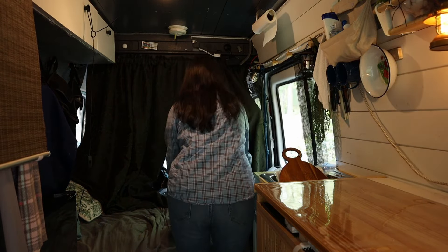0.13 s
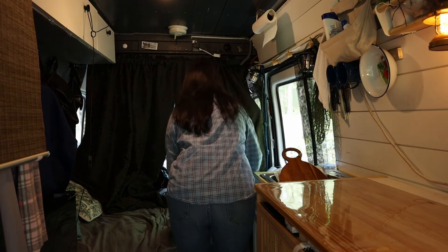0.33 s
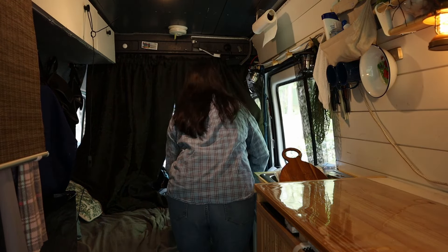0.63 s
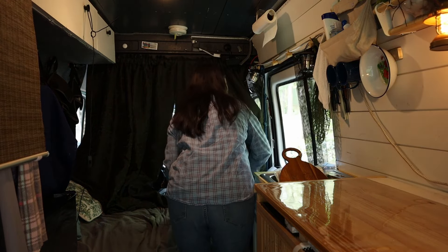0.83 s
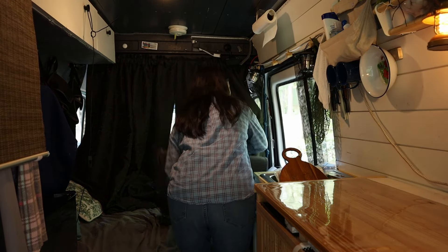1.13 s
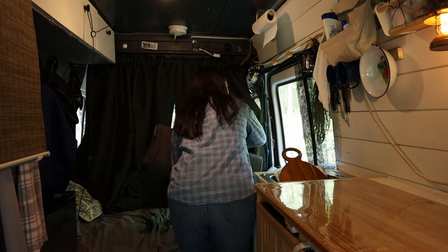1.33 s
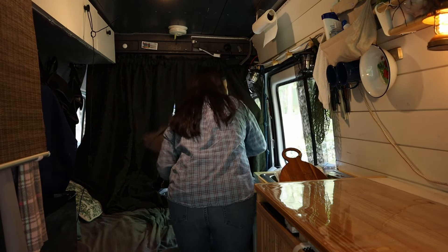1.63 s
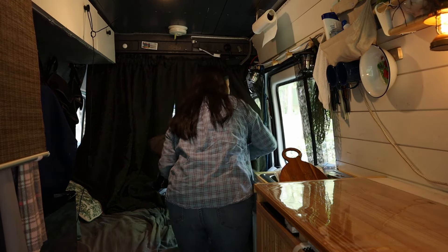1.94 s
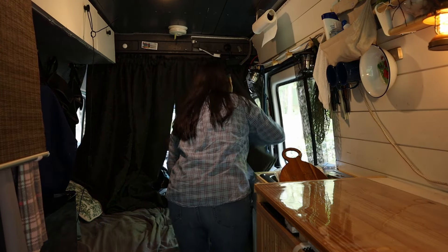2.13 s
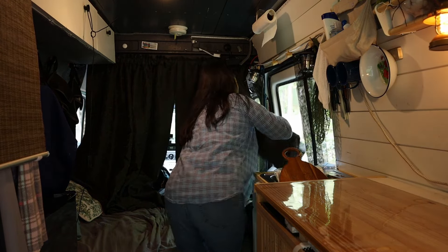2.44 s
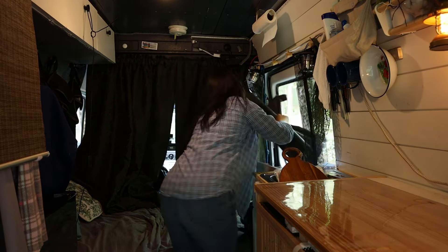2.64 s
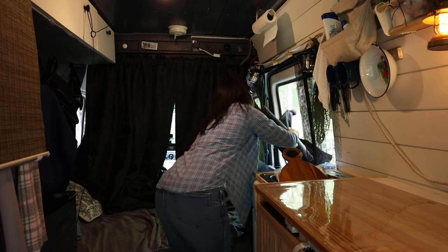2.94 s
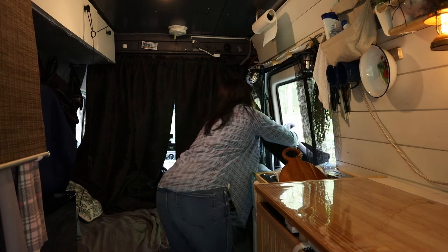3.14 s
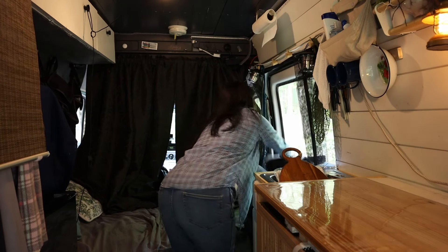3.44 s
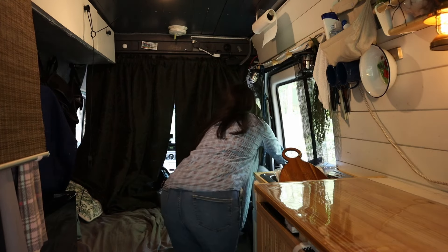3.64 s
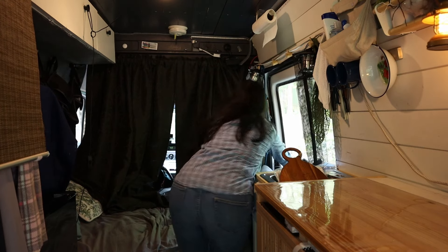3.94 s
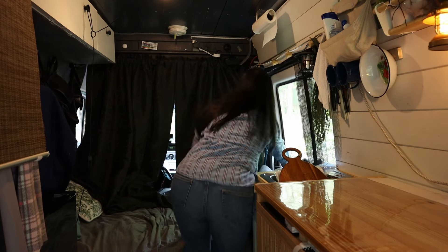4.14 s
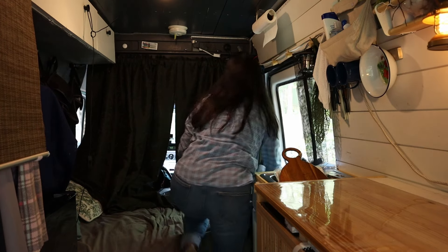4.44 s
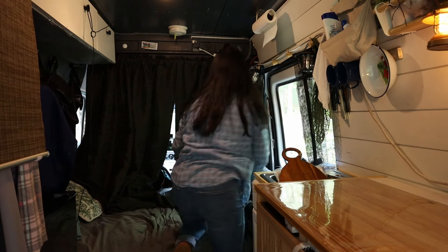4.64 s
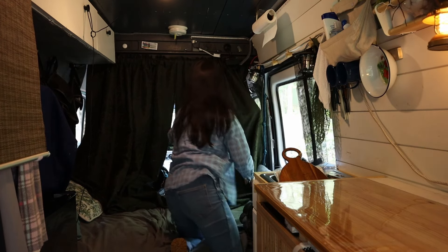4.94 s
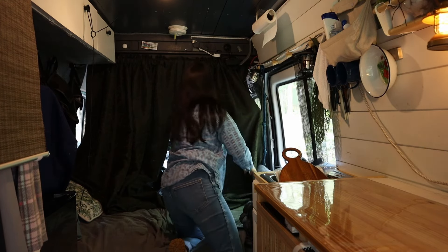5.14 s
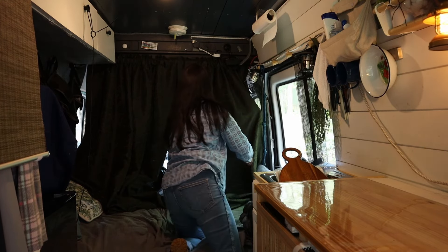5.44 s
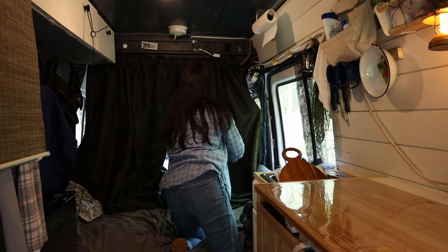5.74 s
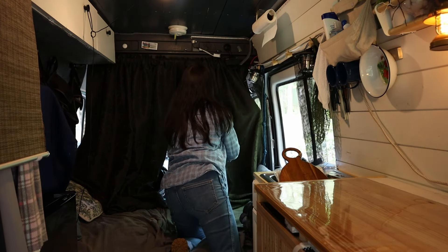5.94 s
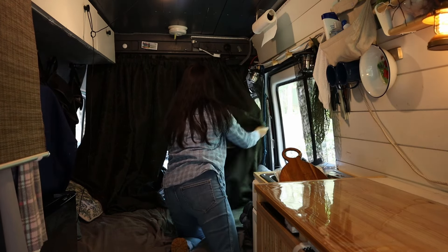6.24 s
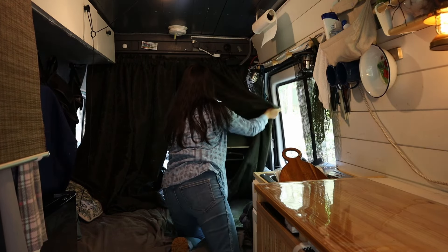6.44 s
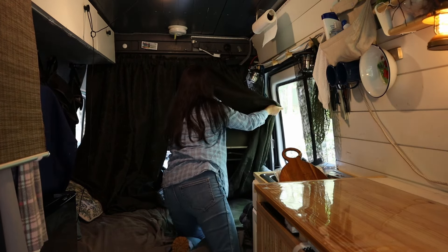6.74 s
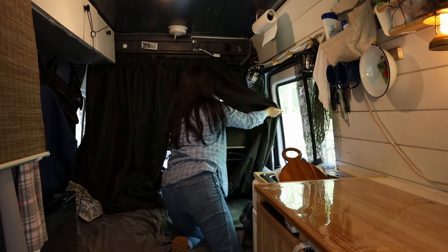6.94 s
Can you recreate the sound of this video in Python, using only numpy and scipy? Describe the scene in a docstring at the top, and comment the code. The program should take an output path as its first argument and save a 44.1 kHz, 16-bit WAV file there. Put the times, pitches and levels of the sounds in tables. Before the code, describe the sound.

In a small wood-lined parked van, close stereo microphones hear a steady low rumble with a very faint, thin whine. From 0 to 2.2 s heavy cloth rubs in short, overlapping strokes, with dry crackling creases; a padded bump and push of air come around 1.35 s, softer bumps near 1.7 s and a bright snap at 1.8 s. From 2.3 to 3.5 s the rubbing is lighter, with crisp snaps and small hard ticks. At about 3.56 s one sharp, loud knock strikes wood, chatters and rattles to rest. Low padded thuds follow until 3.9 s, then softer knee blows, cloth rustle and dull bedding scrapes to about 5.4 s, with a short bed-frame groan near 5.2 s. A small cluster of ticks falls around 5.5 s. Afterwards only sparse ticks, faint cloth and a soft weight shift near 6.5 s remain, until about 7 s.

```python
"""Cloth rubs and creases as someone in a parked van pulls a padded cover from behind a heavy curtain.
Small hard fittings tick, the cover lands with one sharp knock on wood, and bed and furniture thud under knees.
A low rumble with a faint whine fills the cabin.
Cloth is coloured friction noise plus runs of snaps; hard and padded bodies are struck decaying modes;
the room is a short dense echo, and two close microphone ports hear it all."""
import sys
import numpy as np
from scipy import signal
from scipy.fft import rfft, irfft
from scipy.io import wavfile
from scipy.ndimage import uniform_filter1d, minimum_filter1d

SR = 44100
rng = np.random.default_rng(int(sys.argv[2]) if len(sys.argv) > 2 else 0)


def persist_wave(psi):
    """Save psi, clipped to +-1, as 16-bit WAV."""
    counts = np.round(np.clip(psi, -1, 1) * 32767).astype(np.int16)
    wavfile.write(sys.argv[1], SR, np.atleast_2d(counts).T)


N = 312669
TIME, BINS = np.arange(N) / SR, np.fft.rfftfreq(N, 1 / SR)
RING = TIME[:SR // 2]  # time axis of one struck sound, s
HEAVY_GRAIN = dict(per_s=2000, spread_db=2, grain_share=.3, flutter_db=.6)  # heavy folds and bedding


def amp(db):
    """Decibels to gain."""
    return 10 ** (np.asarray(db) / 20)


def unit(x):
    """Scales to rms 1."""
    return x / np.sqrt(np.mean(x ** 2) + 1e-20)


def read(points, hz):
    """Joins (Hz, value) points on a log-frequency axis."""
    f, value = np.transpose(points)
    return np.interp(np.log(hz + 1), np.log(f + 1), value)


def add(mix, s, sound):
    """Adds a sound to the mix at time s."""
    part = mix[..., max(round(s * SR), 0):][..., :sound.shape[-1]]
    part += sound[..., :part.shape[-1]]


def colour(x, spectrum):
    """Filters a steady sound by a spectrum, then scales to rms 1."""
    return unit(irfft(rfft(x) * amp(read(spectrum, BINS)), N))


def band(x, hz, ratio, order=2):
    """Causal band-pass from hz / ratio to hz * ratio."""
    sos = signal.butter(order, [hz / ratio, hz * ratio], "band", fs=SR, output="sos")
    return signal.sosfilt(sos, x)


def wander(rate_hz):
    """Slow random motion of rms 1."""
    return unit(irfft(rfft(rng.standard_normal(N)) / (1 + (BINS / rate_hz) ** 2), N))


def fade(t60_s):
    """Exponential decay, 60 dB down after t60_s."""
    return np.exp(-np.log(1000) * RING / t60_s)


def sine(hz):
    """One undamped mode, starting at zero phase."""
    return np.sin(2 * np.pi * hz * RING)


def burst(hz, ratio, t60_s):
    """Two rows of a dying cluster of many close modes around hz, starting at about rms 1."""
    shape = fade(t60_s)
    x = band(rng.standard_normal((2, len(RING))) * shape, hz, ratio, order=3)
    return x * np.linalg.norm(shape) / np.linalg.norm(x, axis=1, keepdims=True)


def friction(per_s, spread_db, grain_share, flutter_db):
    """Countless fibres slip as a hiss; single threads catch and let go as grains; the pressure flutters."""
    sizes = amp(spread_db * np.minimum(rng.exponential(1, N), 4))
    caught = rng.random(N) < per_s / SR
    grains = unit(sizes * rng.choice([-1, 1], (2, N)) * caught)
    hiss = rng.standard_normal((2, N))
    mixed = np.sqrt(grain_share) * grains + np.sqrt(1 - grain_share) * hiss
    return mixed * amp(flutter_db * wander(49))


def gesture(start_s, length_s, attack_s, release_s):
    """A movement gathers speed, holds until start + length and dies away exponentially."""
    rise = np.clip((TIME - start_s) / attack_s, 0, 1)
    return rise * np.exp(-np.clip((TIME - start_s - length_s) / release_s, 0, 20))


def effort(rows, attack_s, release_s):
    """Joint gain of (start_s, length_s, level_db) movements: their powers add."""
    powers = [(amp(db) * gesture(start, length, attack_s, release_s)) ** 2 for start, length, db in rows]
    return np.sqrt(sum(powers))


# left-right coherence of near sounds: frequency_hz, coherence (0-1)
NEAR_COHERENCE = [(70, 1), (250, 1), (1200, 0.98), (2500, 1), (4500, 0.64), (8000, 0.38), (14000, 0.9)]
# lag of the left port: frequency_hz, lag_rad
PORT_PHASE = [(20, .01), (100, .05), (250, .13), (500, .26), (1000, .5), (2000, .98), (4000, 2.1),
              (6500, 2.8), (15000, 2.7)]


def ports(pair, coherence=NEAR_COHERENCE):
    """Two close ports share row one; row two enters the left as coherence falls, and left lags in phase."""
    right, other = rfft(pair)
    same = read(coherence, BINS)
    left = (same * right + np.sqrt(1 - same ** 2) * other) * np.exp(-1j * read(PORT_PHASE, BINS))
    return irfft(np.array([left, right]), N)


# echo decay of the cabin: frequency_hz, t60_s
CABIN_DECAY = [(100, .35), (400, .36), (1000, .26), (3000, .14), (10000, .07)]


def cabin(x):
    """Short, dense echo of a small wood-lined room: noise decaying at its own rate in each band."""
    hz, t, z = signal.stft(rng.standard_normal((2, SR // 2)), SR, nperseg=256)
    decay = amp(-60 * t / read(CABIN_DECAY, hz)[:, None])
    tail = signal.istft(z * decay, SR, nperseg=256)[1]
    tail[:, :SR // 200] = 0  # the nearest wall answers after 5 ms
    tail /= np.linalg.norm(tail[0])
    return ports(signal.fftconvolve(x[None], tail, axes=1)[:, :N])


# strokes of cloth on cloth, levels before the layer trims in cloth():
# start_s, length_s, rub_db, fizz_re_rub_db, folds_re_rub_db, release_s (time constant)
STROKES = [(-.02, .13, -43, -8, -20, 0.065), (0.171, 0.089, -39, -7, -14, 0.043),
           (0.248, .06, -46, -8, -8, .012), (0.368, 0.068, -51.5, -5, 1, .05),
           (0.434, 0.17, -45, -4, -3.5, 0.045), (0.609, .13, -43.5, -8, -6, 0.052),
           (0.762, .12, -41, -7, -7, 0.062), (.89, 0.15, -46.5, -10.5, 0.5, 0.048),
           (1.027, 0.14, -48, -10.5, -2, 0.023), (1.193, 0.14, -47.5, -6.5, -2, 0.03),
           (1.342, 0.023, -38, -10, 0, .05), (1.372, 0.052, -35, -9, -10, 0.044),
           (1.453, .15, -44.5, -8, -2.5, 0.044), (1.61, 0.19, -39.5, -10, -10, .04),
           (1.81, 0.067, -39.5, -14, -14, 0.038), (1.886, .1, -42, -8.5, -4, 0.041),
           (2, 0.22, -49.5, -9, -0.5, 0.039), (2.225, .16, -60.5, -18, 4, .04),
           (2.598, 0.63, -55, -10.5, -13, 0.066), (2.876, 0.022, -44, -16, 0, 0.023),
           (2.972, 0.048, -46, -3, 5, 0.025), (3.108, 0.075, -45, -10, -4, 0.031),
           (3.218, 0.065, -47.5, -9, -5, 0.024), (3.296, .12, -48, -6, -4, 0.047),
           (3.426, 0.17, -48.5, -9, 6, 0.046), (3.605, 0.071, -45, -9, -11, 0.027),
           (3.764, .23, -47.5, -9.5, 1.5, 0.063), (4.035, 0.16, -50, -14, 7, .05),
           (4.203, .11, -46.5, -4, 2.5, .055), (4.297, .11, -48.5, -3.5, -15, 0.035),
           (4.436, 0.088, -54.5, -27, 4, 0.079), (4.65, 0.31, -55, -11, 10.5, .055),
           (4.811, .2, -47.5, -16, 5.5, .045), (5.068, 0.14, -52, -23, 9.5, 0.04),
           (5.217, .016, -44.5, -18, 10.5, 0.031), (5.634, 0.39, -60, -25, 5.5, .055),
           (6.009, .045, -53.5, -6, 5, .03), (6.302, 0.32, -66, -2, -12, .055),
           (6.924, .13, -57, -10, 8, .055)]
# clothing that never quite lies still, before the same trims: rub_db, fizz_db, folds_db
RESTING_DB = (-63.5, -69, -53.5)


def stroke_gains(attack_s=0.022):
    """Gains of rub, fizz and folds: all follow each stroke, above the stir of resting clothes."""
    shapes = np.array([gesture(start, length, attack_s, release)
                       for start, length, *_, release in STROKES])
    levels = amp([(rub, rub + fizz, rub + folds) for _, _, rub, fizz, folds, _ in STROKES])
    return np.sqrt(levels.T ** 2 @ shapes ** 2 + amp(RESTING_DB)[:, None] ** 2)


def drift(x, patch_db, patch_hz, patch_s):
    """As folds open and close, patches of the spectrum swell and sink."""
    hz, t, z = signal.stft(x, SR, nperseg=512)
    field = uniform_filter1d(rng.standard_normal(z.shape), max(round(patch_hz / hz[1]), 1), axis=-2)
    field = uniform_filter1d(field[0], max(round(patch_s / t[1]), 1), axis=-1)
    return signal.istft(z * amp(patch_db * unit(field)), SR, nperseg=512)[1][:, :N]


# spectrum of the rubbed weave: frequency_hz, density_db (per Hz, relative)
RUB = [(290, -31), (500, -9), (693, -7.5), (915, -10), (1010, -3), (1150, -5.5), (1560, -2), (2210, 0.5),
       (2990, -0.5), (4000, -6.5), (9000, -30.5), (11700, -61), (19800, -120)]
# spectrum of the brushed fibres: frequency_hz, density_db (per Hz, relative)
FIZZ = [(2500, -35), (4500, 0), (6000, -2), (9000, -6), (11500, -16.5), (14000, -18.5), (16000, -31)]
# spectrum of the heavy folds: frequency_hz, density_db (per Hz, relative)
FOLDS = [(50, -28), (130, 0.5), (300, 2), (700, 3.5), (1100, 4), (1700, 0.5), (3000, -57.5)]


def cloth(rub_gain, fizz_gain, fold_gain):
    """Each stroke rubs the weave, brushes its fibres and shifts heavy folds, under an uneven grip."""
    grip = amp(0.5 * wander(27))
    weave = friction(per_s=700, spread_db=2.2, grain_share=.45, flutter_db=1.3)
    rub = amp(2.0) * rub_gain * colour(weave, RUB)
    rub = drift(rub, patch_db=2.0, patch_hz=600, patch_s=0.055)
    fibres = friction(per_s=590, spread_db=5.5, grain_share=0.17, flutter_db=2.5)
    fizz = amp(-1.0) * fizz_gain * colour(fibres, FIZZ)
    folds = amp(-5.5) * fold_gain * colour(friction(**HEAVY_GRAIN), FOLDS)
    return ports(grip * (rub + fizz + folds))


def crease(db, length_s, crunch_db, snaps_per_s=350):
    """A fold gives way in a quick run of snaps, each a bright crack over a duller crunch."""
    run = rng.uniform(-0.96, 1, len(RING)) * (rng.random(len(RING)) < snaps_per_s / SR)
    run *= 2 * amp(-3.5) * (RING < length_s)
    run[0] = 1  # the first snap
    crack = burst(3450, 1.85, .022) + amp(-13.5) * burst(9200, 1.29, 0.027)
    snap = crack + amp(crunch_db) * burst(2220, 1.74, 0.036)
    return amp(db - 10.0) * signal.fftconvolve(run[None, :SR // 10], snap[:, :SR // 10], axes=1)


# placed buckling folds, level before the 10 dB cut in crease():
# start_s, level_db, crackle_length_s, crunch_re_crack_db
CREASES = [(.057, -41, .015, -6), (.165, -35.5, .01, -3), (0.6074, -32, .012, -5), (0.6526, -34, .02, 8.5),
           (.7073, -32.5, .02, 4), (0.7622, -34.5, .035, 4.5), (1.046, -39, .015, -3),
           (1.107, -38, .008, -1), (1.258, -35, .012, 4.5), (1.394, -33.5, .008, -5),
           (1.521, -36.5, .012, 7), (1.57, -35, .01, 0), (1.742, -42, .012, 3), (1.78, -24.5, .003, 4),
           (1.8542, -33, .025, 2), (1.925, -34.5, .012, 0), (1.9755, -40, .014, -8),
           (2.041, -40.5, .008, 9.5), (2.098, -39, .01, 5), (2.14, -33, .012, -14), (2.197, -34, .003, -6),
           (2.25, -39.5, .008, 6), (2.2982, -27.5, .005, -8), (2.344, -32, .005, -1),
           (2.373, -31, .01, -14), (2.533, -40, .01, -10), (2.61, -40, .012, -3), (2.672, -48, .015, -5),
           (2.803, -42, .005, 8.5), (2.8185, -36.5, .008, 4), (2.8941, -33, .012, 2),
           (2.934, -44.5, .008, 10), (2.959, -32, .008, 3), (3.001, -29, .014, 1.5),
           (3.0253, -32, .008, -9), (3.0816, -36, .003, -1), (3.116, -26, .006, -17),
           (3.134, -30, .008, -1), (3.155, -34, .015, 4.5), (3.1708, -36, .018, 3), (3.211, -34, .008, 3),
           (3.2645, -32.5, .008, -6), (3.2773, -34, .008, 0), (3.3226, -42, .006, 3),
           (3.3428, -37, .008, -7), (3.392, -39, .015, 2), (3.522, -43, .02, 7), (3.649, -33, .01, 1),
           (3.7164, -32, .004, -10), (4.0684, -40, .005, -10), (4.1644, -34.5, .012, 5),
           (4.207, -33, .008, -8), (4.409, -31, .012, 0.5), (4.519, -34.5, .005, -6),
           (4.744, -39, .008, -8), (4.851, -34, .008, -8), (5.242, -41, .008, -6), (5.2845, -39, .005, 5),
           (5.73, -52, .01, -8), (6.055, -44, .02, -3), (6.982, -54, .015, 10)]


def creases(rub_gain, small_count=50, small_spread_db=3):
    """Placed folds buckle at set moments; small ones come by chance, their level following the rubbing."""
    out = np.zeros((2, N))
    at = rng.integers(0, N, small_count)
    small_db = 20 * np.log10(rub_gain[at]) + small_spread_db * rng.standard_normal(small_count)
    for s, db in zip(at / SR, small_db):
        add(out, s, crease(db, length_s=.005, crunch_db=-1))
    for s, *fold in CREASES:
        add(out, s, crease(*fold))
    return ports(out) + amp(-9.5) * cabin(out[0])


# light touches of hard fittings: start_s, level_db (before layer trims), pitch_hz, t60_s (of the clack)
TICKS = [(1.7773, -26, 1540, 0.03), (2.298, -28, 2220, 0.052), (2.4064, -32.5, 2040, 0.047),
         (2.462, -39, 2730, 0.058), (2.533, -42, 2320, 0.16), (2.6713, -39.5, 2430, 0.063),
         (2.846, -35, 2900, 0.085), (2.9855, -30, 2750, 0.06), (3.0817, -38, 1890, 0.11),
         (3.3177, -40, 2500, .092), (3.277, -43, 1900, 0.037), (4.167, -33.5, 1790, 0.035),
         (4.742, -31.5, 1690, 0.074), (5.031, -30.5, 1460, 0.073), (5.284, -35, 1890, 0.029),
         (5.3708, -40.5, 1487, 0.095), (5.426, -41, 1490, .05), (5.47, -29.5, 2150, 0.061),
         (5.49, -28, 2150, 0.056), (5.5, -38, 2000, 0.051), (5.5358, -37.5, 1650, 0.048),
         (5.6083, -33.5, 1920, 0.075), (5.758, -44, 2080, .06), (5.827, -46, 2660, 0.056),
         (5.916, -38.5, 2060, 0.066), (6.049, -42, 1620, 0.085), (6.7598, -40.5, 1670, 0.07),
         (6.767, -43, 1550, 0.062)]
# contact click under each tick: level_re_clack_db, centre_hz, half_width_ratio, t60_s
CLICK_DB, CLICK_HZ, CLICK_RATIO, CLICK_T60_S = (-10, 1900, 2.3, .028)


def ticks(mode_db=-6.5, mode_t60_ratio=0.87):
    """Fittings touch: a tiny click, a short clack with broad skirts, and one clear decaying mode."""
    out = np.zeros((2, N))
    for s, db, hz, t60 in TICKS:
        clack = burst(hz, 1.31, t60) + amp(-9.5) * burst(hz, 1.84, t60)
        click = amp(CLICK_DB) * burst(CLICK_HZ, CLICK_RATIO, CLICK_T60_S)
        add(out, s, amp(db - 3.0) * (clack + click))
        add(out[0], s, amp(db + mode_db) * sine(hz) * fade(t60 * mode_t60_ratio))
    return ports(out) + amp(-16) * cabin(out[0])


# the sharp knock and its chatter: start_s, force_db (relative)
KNOCKS = [(3.5635, -2), (3.565, -3), (3.5663, 1), (3.5751, -9.5), (3.598, -30)]
# spectrum of one contact: frequency_hz, density_db (per Hz, relative)
CRACK = [(60, -22), (150, -16), (300, 7), (650, -4), (930, 14), (1350, 0), (2250, 4), (3200, -18),
         (5000, -40), (8000, -31), (12000, -28), (16000, -39)]
# ringing modes of the wood: pitch_hz, level_db, t60_s
WOOD = [(328, -24, .24), (436, -26.5, .17), (598, -25, .14), (706, -19, .07), (780, -21, .14),
        (886, -17, .09), (980, -14, .085), (1042, -16, .09), (1126, -12.5, .07), (1220, -19, .05),
        (1390, -23, .08), (1550, -20, .079), (1633, -19.5, .082), (1763, -11, .073), (1873, -23, .089),
        (2072, -14, .057), (2207, -24, .071), (2328, -15, .07), (2440, -17, .075), (2550, -24, .089),
        (2713, -25, .074)]
# direct knock between the ports: frequency_hz, left_minus_right_db
KNOCK_BALANCE = [(300, 2.5), (550, -6), (1000, 1.2), (2000, -0.3), (4000, -3), (12000, -6)]


def knock(crack_db=16, rattle_db=-19, room_db=-26, left_lag_ms=0.036):
    """A hard edge strikes wood and chatters: each contact cracks, and the panel rings on from the first."""
    log_gain = np.log(amp(read(CRACK, abs(np.fft.fftfreq(len(RING), 1 / SR)))))
    # minimum phase: the shortest causal click of that colour
    crack = np.fft.ifft(np.exp(np.conj(signal.hilbert(log_gain)))).real
    crack /= np.linalg.norm(crack)
    out = np.zeros(N)
    for s, db in KNOCKS:
        add(out, s, amp(db + crack_db) * crack)
    ring = sum(amp(db) * sine(hz) * fade(t60) for hz, db, t60 in WOOD)
    ring *= 1 - fade(0.0042)  # soft onset
    rattle = amp(rattle_db) * burst(1370, 1.97, 0.09)[0]
    add(out, KNOCKS[0][0], ring + rattle)
    lag = np.exp(-2j * np.pi * BINS * left_lag_ms / 1000)
    left = irfft(rfft(out) * amp(read(KNOCK_BALANCE, BINS)) * lag, N)
    return np.array([left, out]) + amp(room_db) * cabin(out)


# spectrum of the cover settling on wood: frequency_hz, density_db (per Hz, relative)
CLATTER = [(100, -13), (250, -3), (330, -4), (520, -1), (780, 1), (1050, 5), (1300, -8), (1600, -7),
           (2400, -26), (3200, -31), (6000, -56)]


def clatter(level_db=-29.5, hold_s=0.048, attack_s=0.0096, release_s=0.031):
    """From the knock on, the cover rattles to rest on the wood in many dull little contacts."""
    contacts = friction(per_s=590, spread_db=4.5, grain_share=0.48, flutter_db=3.5)
    settling = gesture(KNOCKS[0][0], hold_s, attack_s, release_s)
    return amp(level_db) * ports(colour(contacts, CLATTER) * settling)


# soft blows on bed and furniture: start_s, level_db (before layer gains), pitch_hz, t60_s (at the pitch)
THUDS = [(0.649, -42, 295, 0.052), (1.333, -33, 242, 0.033), (1.3507, -22.5, 436, 0.029),
         (1.353, -26, 130, 0.084), (1.362, -33, 245, 0.085), (1.411, -31, 198, 0.029), (1.44, -46, 89, .11),
         (1.667, -33, 750, 0.051), (1.673, -33, 356, 0.06), (1.68, -28.5, 102, 0.057),
         (1.782, -32, 476, 0.026), (2.816, -39, 676, 0.028), (3.318, -39, 910, 0.04),
         (3.61, -19, 108, 0.049), (3.615, -23.5, 225, 0.06), (3.623, -26, 440, 0.082),
         (3.631, -23.5, 773, 0.083), (3.652, -26, 330, 0.075), (3.68, -39, 575, 0.056),
         (3.731, -22, 111, 0.074), (3.7664, -18.5, 163.6, 0.11), (3.771, -26.5, 431, 0.075),
         (3.7647, -24.5, 917, 0.032), (3.776, -23.5, 287, 0.069), (3.809, -22, 80, 0.055),
         (3.868, -33, 420, 0.045), (3.897, -25.5, 173, 0.063), (4.125, -28, 112, 0.083),
         (4.149, -25, 287, 0.036), (4.176, -31.5, 74, 0.083), (4.368, -29.5, 208, 0.077),
         (4.43, -25.5, 425, 0.02), (4.513, -28.5, 247, 0.037), (4.747, -35.5, 85, 0.1),
         (4.882, -24.5, 194, 0.089), (4.985, -25.5, 120, 0.039), (5.03, -34.5, 630, 0.054),
         (5.2385, -32.5, 785, 0.08), (5.238, -21.5, 141, 0.038), (5.287, -35, 398, 0.041),
         (5.302, -36, 870, 0.053), (5.378, -30.5, 118, 0.07), (5.402, -47, 73.5, 0.051),
         (5.432, -29.5, 199, 0.073)]
# modes of a padded panel: pitch_multiple, level_db
PANEL = [(.63, -4), (1, 6), (1.47, -3.5), (2.15, -34), (3.2, -23)]
# air pushed by broad flaps of cloth: start_s, level_db, pitch_hz, t60_s
PUFFS = [(1.356, -24, 36.5, 0.12), (2.839, -38, 60.5, 0.3), (3.761, -26, 53.7, 0.13)]


def thuds(rise_cycles=0.41):
    """Padded blows: a panel booms in a few modes, the higher dying sooner; flaps of cloth push air."""
    out = np.zeros((2, N))
    for s, db, hz, t60 in THUDS:
        boom = sum(amp(mode_db) * sine(hz * k) * fade(t60 / np.sqrt(k)) for k, mode_db in PANEL)
        blow = amp(db) * (1 - np.exp(-RING * hz / rise_cycles))  # lower pitch, slower rise
        add(out[0], s, 0.6 * blow * boom)
        add(out, s, 0.33 * blow * burst(1.58 * hz, 2.04, t60))
    for s, db, hz, t60 in PUFFS:
        add(out[0], s, -amp(db) * sine(hz) * fade(t60))
    return ports(out) + amp(-13.5) * cabin(out[0])


# knees and shins over the bedding: start_s, length_s, level_db
DRAGS = [(4.135, 0.033, -39.5), (4.32, 0.069, -41.5), (4.39, 0.063, -44.5), (4.8, 0.077, -46.5),
         (4.865, 0.1, -34), (4.96, 0.059, -38), (5.222, 0.017, -33.5), (6.035, 0.031, -43)]
# spectrum of the scraped bedding: frequency_hz, density_db (per Hz, relative)
BEDDING = [(80, -21), (200, 2), (450, -4.5), (900, -6), (1300, -7.5), (1800, -2), (2500, -10.5),
           (3500, -33), (5000, -19.5), (6500, -43), (15000, -42)]


def drags():
    """Denim under body weight scrapes the bedding with a dense, dull rasp."""
    rasp = colour(friction(**HEAVY_GRAIN), BEDDING)
    return ports(rasp * effort(DRAGS, attack_s=0.025, release_s=0.021))


# bed frame under a knee: start_s, length_s, level_db
GROANS = [(5.16, .11, -40.5), (5.181, 0.028, -33.5)]
# spectrum of the frame's dull resonance: frequency_hz, density_db (per Hz, relative)
BED_RESONANCE = [(100, -21), (350, -6.5), (480, -0.5), (600, 4), (740, -7), (1000, -10), (1600, -22),
                 (4000, -58)]


def groan():
    """The bed frame sticks and slips under a knee; the uneven slips sound through one dull resonance."""
    slips = friction(per_s=1800, spread_db=5.5, grain_share=0.29, flutter_db=1.0)
    return ports(colour(slips, BED_RESONANCE) * effort(GROANS, attack_s=0.0087, release_s=0.014))


# body weight moving on floor and bed frame: start_s, length_s, level_db
SHIFTS = [(-.05, 0.27, -46.5), (1.33, 0.071, -51), (2.74, 0.17, -47.5), (3.6, 0.25, -43), (4.1, 0.35, -52),
          (4.85, 0.19, -54), (5.2, 0.17, -41), (6.48, 0.056, -46)]
# spectrum of floor and frame: frequency_hz, density_db (per Hz, relative)
FRAME = [(20, -18), (45, 5.5), (90, 3.5), (150, -13), (260, -6), (500, -41), (1200, -67.5)]


def shifting():
    """The floor and bed frame rumble under a moving load: low noise follows each shift."""
    load = colour(rng.standard_normal((2, N)), FRAME)
    return ports(load * effort(SHIFTS, attack_s=0.043, release_s=0.19))


# spectrum of the steady rumble: frequency_hz, density_db (per Hz, relative)
RUMBLE = [(15, -24), (30, -2), (50, -1.5), (80, -2), (120, -5.5), (180, -12.5), (290, -11), (450, -16),
          (750, -16.5), (1100, -25), (2200, -23.5), (4000, -33.5), (8500, -42), (12500, -55), (14000, -82)]
# left-right coherence of the background: frequency_hz, coherence (0-1)
DIFFUSE_COHERENCE = [(60, 1), (100, 1), (160, 0.75), (280, 0.35), (500, 0.071), (1000, 0.17), (2500, 0.95),
                     (5000, 0.2), (14000, 0.64)]


def rumble(floor_db=-49, boom_db=-48, boom_hz=57, whine_db=-68, whine_hz=763):
    """Steady low noise, stronger in the cabin's lowest resonance, under a thin wavering whine."""
    floor = amp(floor_db) * colour(rng.standard_normal((2, N)), RUMBLE)
    boom = amp(boom_db) * unit(band(rng.standard_normal((2, N)), boom_hz, 1.098))
    phase = 2 * np.pi * np.cumsum(whine_hz + 4 * wander(6.9)) / SR
    whine = amp(whine_db) * unit(np.sin(phase) * amp(2 * wander(1.0)))
    return ports(floor + boom + whine, DIFFUSE_COHERENCE)


def scene():
    """Everything heard in the van."""
    rub, fizz, folds = stroke_gains()
    fabric = cloth(rub, fizz, folds) + creases(rub)
    hard = ticks() + knock() + clatter()
    body = thuds() + drags() + groan() + shifting()
    return fabric + hard + body + rumble()


def record(dry, edge_hz=15800):
    """A very fast limiter flattens crests above full scale; then a low-pass sets the band limit."""
    allowed = 1 / np.maximum(abs(dry), 1)
    gain = uniform_filter1d(minimum_filter1d(allowed, size=3), size=3)
    lowpass = signal.firwin(511, edge_hz, window=("kaiser", 9), fs=SR)
    return signal.oaconvolve(dry * gain, lowpass[None], "same")


dry = scene()
out = record(dry)
persist_wave(out)
```